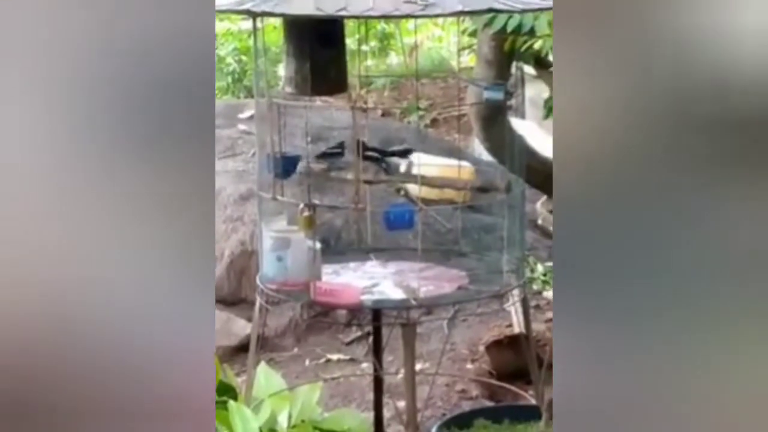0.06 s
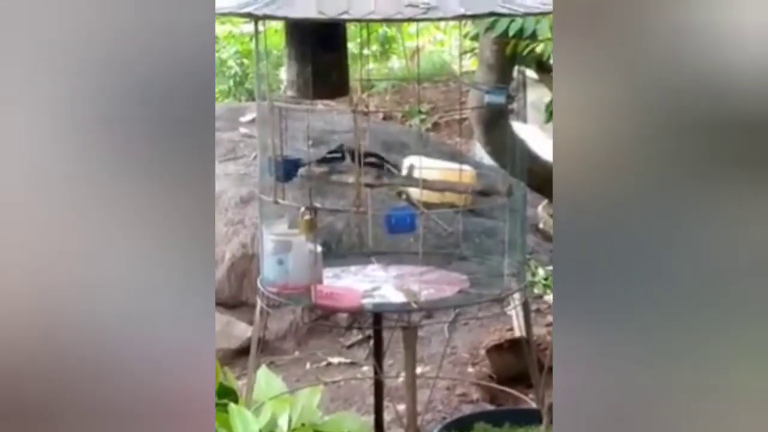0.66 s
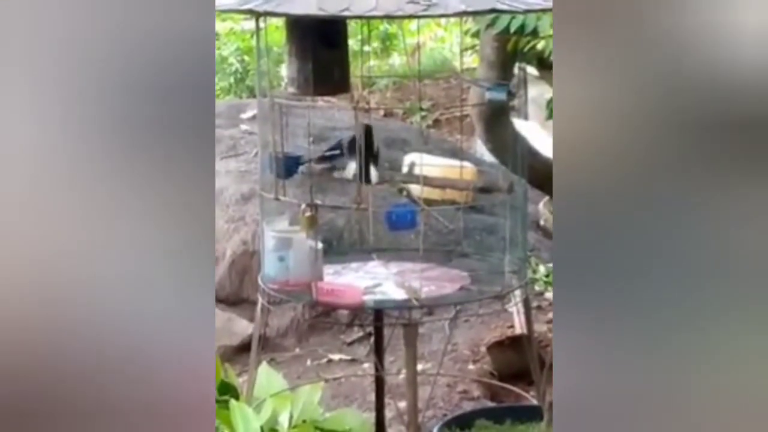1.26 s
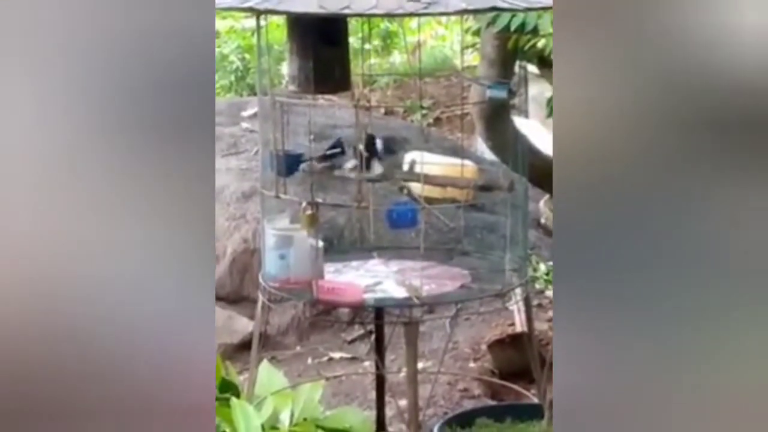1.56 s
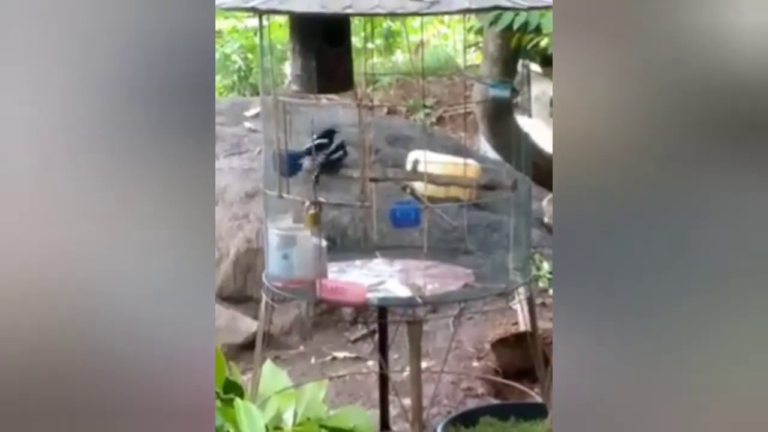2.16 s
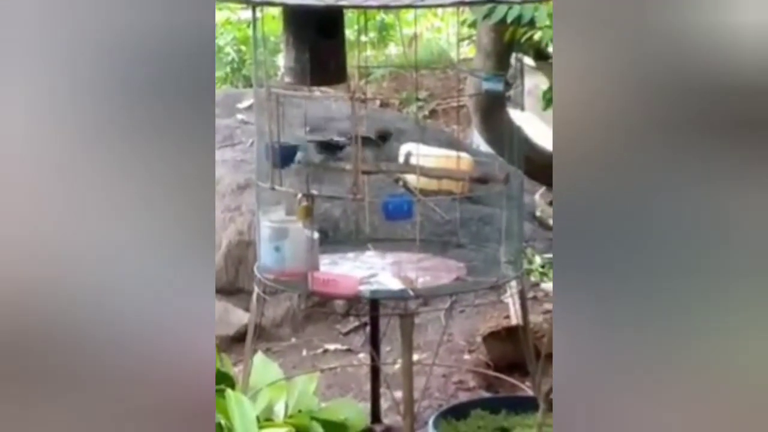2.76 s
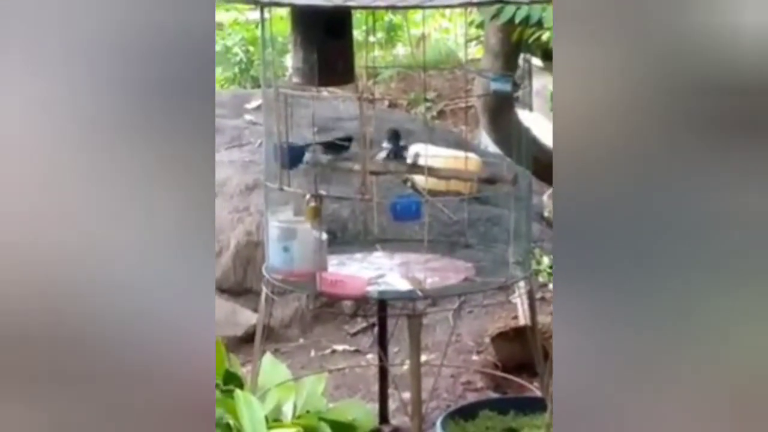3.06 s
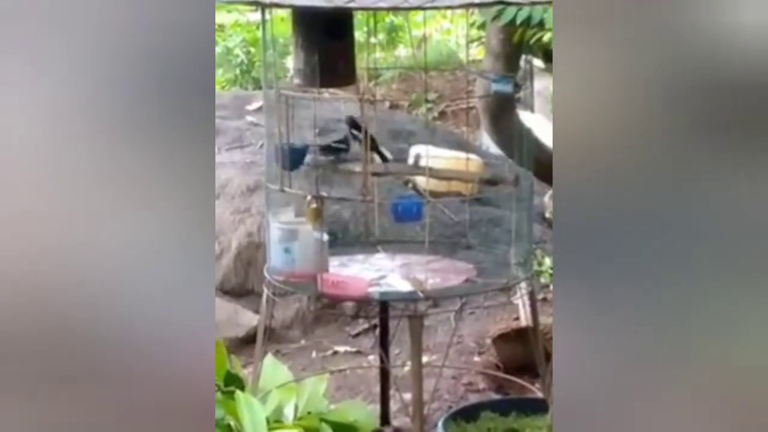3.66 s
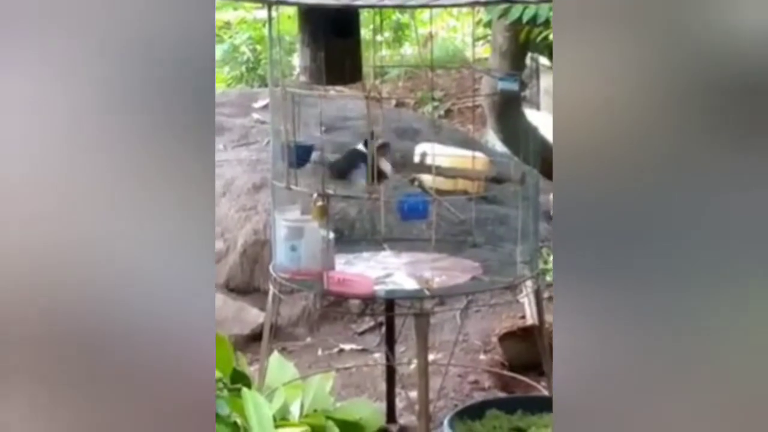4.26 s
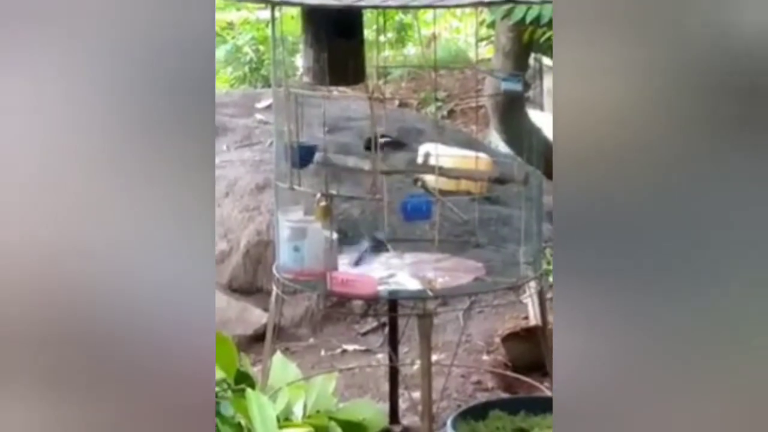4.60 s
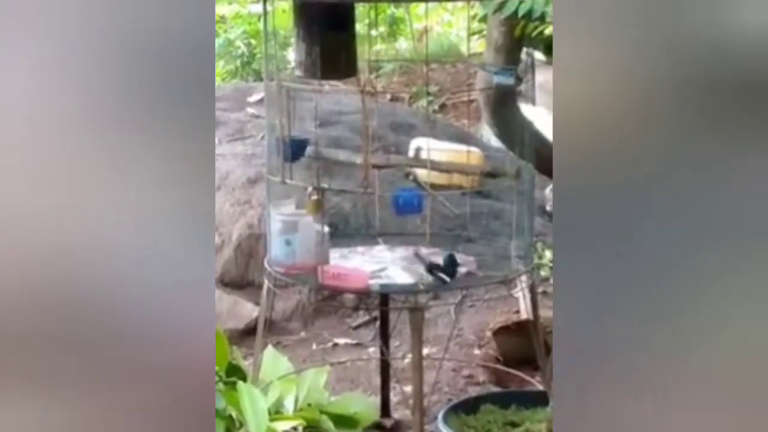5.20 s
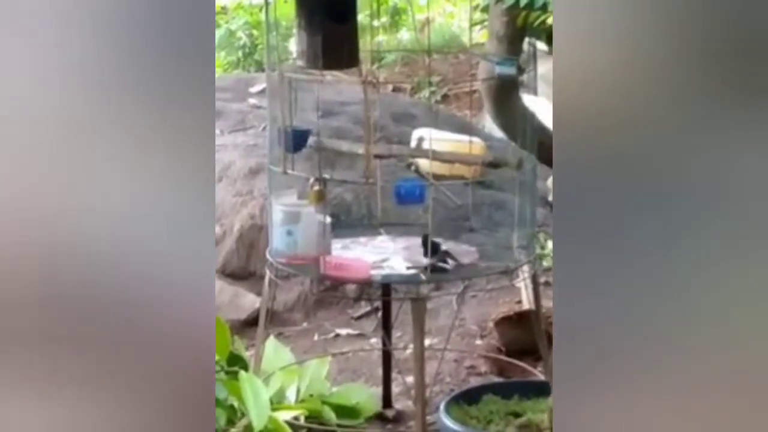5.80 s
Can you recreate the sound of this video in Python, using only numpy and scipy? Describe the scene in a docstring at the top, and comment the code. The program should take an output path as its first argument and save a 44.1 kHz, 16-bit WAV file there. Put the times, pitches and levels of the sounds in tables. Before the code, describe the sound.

In a quiet yard, a pair of caged birds a few metres away scold each other with sharp chips, squeaks and raspy falling calls. They switch to short upward whistles and brief level notes, lightly bumping the perches, then flare into thin screeches, shrill squeaks and two buzzing snarls. Nearby rock adds a slight echo and the cage wires ring faintly. Soft outdoor air and a far motor's hum lie underneath.

```python
"""Magpie-robins squabble and sing in a wire cage in a yard, a few metres away.
First the syrinx gives squeaks, harsh chips, hoarse downslurs and brief whistles. From 2.3 s come
upslurs and knocks on the perches, then more whistles, chips and squeaks. From 4.5 s the membranes
slap in three screeches, from 5.3 s in two nasal snarls. Throughout, nearby rock and walls smear
each note and the wires ring, over outdoor air, a low rumble and a far motor."""
import sys
import numpy as np
from scipy import signal
from scipy.fft import rfft, irfft
from scipy.io import wavfile
from scipy.ndimage import map_coordinates

SR = 44100
rng = np.random.default_rng(int(sys.argv[2]) if len(sys.argv) > 2 else 0)


def digitize_waveform(pressure):
    """Quantize a signal to 16-bit integers and store it at the path in sys.argv[1].

    Rows of a 2-D input are taken as channels; values are limited to [-1, 1].
    """
    field = np.atleast_2d(pressure).T
    bounded = np.clip(field, -1, 1)
    quanta = np.round(bounded * 32767).astype(np.int16)
    wavfile.write(sys.argv[1], SR, quanta)


N = 257544
TIME_S = np.arange(N) / SR


def syrinx(arc_hz, rasp, wobble=0.00376, flutter=0.0567, shake=0.51, grit=0.16):
    """Pitch, phase and pressure of one note; a rasping membrane shakes in pitch and strength."""
    size = len(arc_hz)
    t = TIME_S[:size]
    rise_s, fall_s = 0.011, 0.0052
    hz = arc_hz * (1 + wobble * wander(size, 48.7) + flutter * rasp * wander(size, 330))
    rise = np.sin(np.pi / 2 * np.clip(t / rise_s, 0, 1))
    fall = np.sin(np.pi / 2 * np.clip(t[::-1] / fall_s, 0, 1))
    uneven_cycles = 1 + grit * rasp * wander(size, 1000)
    pressure = unit(rise * fall * uneven_cycles * np.exp(shake * rasp * wander(size, 221)))
    return hz, 2 * np.pi * np.cumsum(hz) / SR, pressure


# Half-closed beak in song: f/Hz, gain/dB
SONG_BEAK = [(1200, 13.5), (3500, 3), (5200, -3), (7200, 4.5), (8800, -16.5), (10800, -4), (12500, -38),
             (14300, -9), (15500, -27)]


def note(arc_hz, rasp, overtone_db, rolloff_db, hiss_db, colour=SONG_BEAK):
    """Coloured syrinx harmonics, plus turbulent air in step with the rasp."""
    hz, phase, pressure = syrinx(arc_hz, rasp)
    k = np.arange(1, 7)[:, None]
    harmonics = undb((k > 1) * (overtone_db + rolloff_db * (k - 3.5))) * (k * hz < SR / 2)
    tone = unit(np.sum(harmonics * response(k * hz, colour) * np.sin(k * phase), axis=0))
    hiss = noise(len(hz), [(1000, -25), (2500, 3), (4500, 10), (6800, 3), (8500, -32),
                           (10000, 8), (15500, -9)])
    return pressure * (tone + undb(hiss_db) * rasp * hiss)


def scratch(size, colour, burst_hz=420, depth=0.53):
    """Chaotic membrane slaps: uneven bursts of coloured noise."""
    edge = np.sin(np.pi * np.linspace(0, 1, size)).clip(0) ** .5
    return unit(noise(size, colour) * edge * np.exp(depth * wander(size, burst_hz)))


# Chip tone colour, two notched outlines: f/Hz, A (bright at 6-7 kHz)/dB, B (bright near 9 kHz)/dB
CHIP_COLOUR = [(1950, -14, -18.5), (2605, -1, -3), (3140, -17, -19), (4260, -1.5, -0.5), (5600, 12.5, -2),
               (5970, 13.5, -8), (6830, 15.5, 0.5), (7950, 8, 4), (8460, -28.5, 7), (9100, -2.5, 9.5),
               (10330, 0.5, -2), (11000, -9.5, -2), (12250, -2.5, 3.5), (13500, 0, -8), (15500, -10, -7)]
# Chips: t/s, length/s, start f/Hz, middle f/Hz, end f/Hz, level/dB, scratch/dB, A-to-B blend/0-1,
# overtones/dB, rasp/0-1
CHIPS = [ (0.206, 0.037, 2410, 2476, 2240, -44, 5, 0, -17, .7),
         (0.307, 0.055, 2725, 2600, 2090, -42, -12, 0.8, -34, 0.97),
         (0.434, 0.067, 2755, 2916, 2584, -40, -15, 0.37, -19, 0.65),
         (0.662, 0.09, 3650, 4364, 4140, -32.5, -12, 0.9, -10.5, 0.74),
         (0.856, 0.049, 2690, 2480, 2106, -29.5, -9, 0, -3, 0.43),
         (0.952, 0.049, 2736, 2534, 2135, -30.5, -14, 0, -3, 0.31),
         (1.078, 0.038, 3360, 3863, 3970, -33, -20, 0.1, -7.5, 0.89),
         (1.105, 0.029, 2680, 2300, 2040, -34, -5, 0, -3, 0.33),
         (1.177, 0.056, 3640, 4090, 4590, -34.5, -9, 0.79, -7, 0.41),
         (1.22, 0.027, 4560, 3953, 2520, -34, -14, 0.46, -8, 0.93),
         (1.683, 0.036, 2572, 2316, 2150, -48, -3.5, 0.36, -1, 0.34),
         (1.762, 0.027, 4240, 4894, 4360, -33, -13, 0.86, -9, .8),
         (1.834, 0.057, 2553, 2346, 1870, -35.5, -1, 0.69, -0.5, 0.58),
         (3.536, 0.06, 5040, 4120, 3510, -38.5, -8, 0.98, -9, 0.68),
         (4.703, 0.035, 3236, 3383, 3190, -34, -7.5, 0.3, -4, 0.53),
         (5.529, 0.075, 1695, 2090, 2083, -33.5, -7, 0.5, -10, 0.5), ]


def chips(rasp_growth=0.46):
    """Scolding pitch arches that roughen, each coloured by a blend of two outlines."""
    out = np.zeros((2, N))
    for start_s, length_s, *pitches_hz, db, scratch_db, blend, overtone_db, rasp in CHIPS:
        u = progress(length_s)
        arc_hz = np.polyval(np.polyfit([0, .5, 1], pitches_hz, 2), u)
        colour = [(hz, a_db + blend * (b_db - a_db)) for hz, a_db, b_db in CHIP_COLOUR]
        effort = np.sin(np.pi / 2 * np.minimum(2 * u, 1)) ** 2
        roughness = rasp + rasp_growth * u
        voice = note(arc_hz, roughness, overtone_db, rolloff_db=-1.5, hiss_db=-20, colour=colour)
        sound = unit(voice) + undb(scratch_db) * unit(effort * scratch(len(u), colour))
        add(out, start_s, undb(db) * unit(sound), pan_db=0.5)
    return out


# Squeaks: t/s, length/s, f/Hz, level/dB, overtones/dB, rasp/0-1, L-R/dB
SQUEAKS = [ (-.003, 0.01, 7043, -16, -10, 0.02, 4.5), (0.018, 0.038, 6750, -28.5, -24, 0, 3),
           (1.774, 0.0156, 6030, -29, -23.5, 0.54, 3), (3.548, 0.043, 5510, -44, -13, 0, -5),
           (3.55, 0.064, 7030, -36.5, -20, 0.56, -0.5), (5.038, 0.1, 7820, -42, -20, 0.2, -4),
           (5.125, 0.066, 7460, -32.5, -12, 0.47, 1), (5.388, 0.15, 7745, -27, -3, 0.16, -3),
           (5.547, 0.058, 7124, -24.5, -6, 1, 1), ]


def squeaks(sag_oct_per_s=.5):
    """Piercing high tones that droop slightly."""
    out = np.zeros((2, N))
    for start_s, length_s, hz, db, overtone_db, rasp, pan_db in SQUEAKS:
        arc_hz = sagging(length_s, hz, sag_oct_per_s)
        voice = note(arc_hz, rasp, overtone_db, rolloff_db=-2.5, hiss_db=-14)
        add(out, start_s, undb(db) * voice, pan_db)
    return out


# Nasal, buzzing bands of a snarl at tuning 1: f/Hz, width/Hz, level/dB
SNARL_BANDS = [(4070, 260, -7.5), (5090, 800, 1.5), (6170, 900, -9), (7580, 600, -3.5), (9120, 2800, -5),
               (10600, 2800, -8.5), (12770, 1900, -8.5), (14800, 2400, -13.5)]
# Snarls: t/s, length/s, tuning/ratio, level/dB, L-R/dB
SNARLS = [(5.294, 0.257, 0.98, -32.5, 0.5), (5.753, 0.15, .94, -36, 3)]


def snarls(slaps_per_s=1300, sag_oct_per_s=.25, attack_s=.014, release_s=0.018):
    """Irregular slaps buzz in slowly sinking nasal bands; low ones also sing, high ones swell."""
    out, t = np.zeros((2, N)), TIME_S[:SR // 40]
    tone_db, tone_db_per_oct, swell_db_per_oct = 3, -24, 4
    for start_s, length_s, tuning, db, pan_db in SNARLS:
        u = progress(length_s)
        gate = np.clip(u * length_s / attack_s, 0, 1) * np.clip((1 - u) * length_s / release_s, 0, 1)
        slaps = rng.choice([-1., 1.], SR) * (rng.random(SR) < slaps_per_s / SR)
        glide = sagging(length_s, tuning, sag_oct_per_s)
        sound = 0
        for hz, width_hz, band_db in SNARL_BANDS:
            octaves = np.log2(hz / SNARL_BANDS[0][0])
            ring = (t ** 2 * np.exp(-np.pi * width_hz * t)) ** 2 * np.sin(2 * np.pi * hz * t)
            rattle = signal.fftconvolve(slaps, ring)
            band = unit(map_coordinates(rattle, [len(t) + np.cumsum(glide)], order=5))
            _, phase, pressure = syrinx(hz * glide, rasp=0.348)
            tone = undb(tone_db + tone_db_per_oct * octaves) * pressure * np.sin(phase)
            swell = undb(swell_db_per_oct * octaves * np.minimum(2 * u, 1))
            sound = sound + undb(band_db) * unit(band + tone) * unit(swell)
        add(out, start_s, undb(db) * unit(gate * sound), pan_db)
    return out


# Upslurs: t/s, length/s, start f/Hz, top f/Hz, foot/s, climb/s, level/dB, overtones/dB, rasp/0-1
UPSLURS = [ (2.295, 0.094, 1877, 2515, 0.012, 0.083, -39.5, -23, 0.15),
           (2.537, 0.11, 1839, 2441, 0.018, 0.078, -39, -18, 0.15),
           (2.804, 0.037, 1947, 2498, 0.0017, 0.01, -38, -25, 0.39),
           (2.992, 0.043, 2023, 2590, 0.0014, 0.015, -38, -25, 0.32),
           (3.148, 0.12, 2590, 3532, 0.0061, .056, -39.5, -10.5, 0.19),
           (3.274, 0.18, 2028, 3274, 0.001525, 0.12, -39.5, -16.5, 0.39),
           (3.735, 0.091, 2918, 3567, 0.023, 0.028, -36.5, -14.5, 0.09),
           (4.159, 0.13, 2316, 2566, 0.0022, .02, -41, -9.5, 0.03), ]


def upslurs(stall=0.92, swell_db=11, full_rasp_hz_per_s=48000, air_db=-19.5):
    """Whistles swell from a low foot in two steps, with a thin rush of air; fast climbs rasp more."""
    out = np.zeros((2, N))
    for start_s, length_s, low_hz, top_hz, foot_s, climb_s, db, overtone_db, rasp in UPSLURS:
        u = progress(length_s)
        climbed = np.clip((u * length_s - foot_s) / climb_s, 0, 1)
        below_top = 1 - climbed + stall * np.sin(4 * np.pi * climbed) / (4 * np.pi)
        arc_hz = top_hz + (low_hz - top_hz) * below_top
        strain = np.sin(np.pi * climbed) * (top_hz - low_hz) / climb_s / full_rasp_hz_per_s
        voice = note(arc_hz, rasp + strain, overtone_db, rolloff_db=-4.5, hiss_db=-15.5)
        air = undb(air_db) * np.sin(np.pi * u) * noise(len(u), [(4000, -34), (9500, -44), (14000, 23)])
        add(out, start_s, undb(db) * (unit(voice * undb(-swell_db * below_top)) + air), pan_db=2)
    return out


# Whistles: t/s, length/s, f/Hz, level/dB, overtones/dB, rasp/0-1, L-R/dB, sag/(oct/s)
WHISTLES = [ (0.895, 0.029, 810, -57.5, -20, 0, 2, 0.032), (1.213, 0.029, 4310, -41, -24, 0.05, 3.5, 0.13),
            (2.593, 0.017, 818, -57, -29, 0.2, 3, .2), (2.862, 0.027, 2490, -45.5, -13, 0.34, -2, -0.061),
            (3.809, 0.034, 6170, -48, -36, 0.05, 6, -0.15), (3.817, 0.044, 2740, -36, -23, 0.3, -0.5, 0.18),
            (3.963, 0.063, 2782, -40.5, -21, 0.11, 0, 0.33),
            (4.295, 0.099, 2767, -45.5, -17, 0.18, 1, -0.19),
            (4.384, 0.028, 2857, -38.5, -25, 0.1, 1, -0.088),
            (4.488, 0.11, 2740, -42, -11.5, 0.21, 2.5, 0.79), (4.737, 0.078, 3390, -37, 0, 0.37, 1, 0.13),
            (4.884, 0.063, 1698, -57, -27, 0.06, -4.5, 0.25),
            (4.913, 0.058, 1676, -52.5, -38, 0.02, 7, 0.33),
            (5.049, 0.096, 2104, -44, -3, 0.18, 0.5, 0.367),
            (5.079, 0.024, 2815, -30, -9, 0.24, -3.5, -0.000092),
            (5.227, 0.095, 1706, -51, -45.5, 0.39, -3, 1.0),
            (5.685, 0.115, 1247, -54.5, -15.5, 0.58, 2, 0.25), ]


def whistles():
    """Tones held near one pitch."""
    out = np.zeros((2, N))
    for start_s, length_s, hz, db, overtone_db, rasp, pan_db, sag_oct_per_s in WHISTLES:
        arc_hz = sagging(length_s, hz, sag_oct_per_s)
        voice = note(arc_hz, rasp, overtone_db, rolloff_db=-7, hiss_db=-4)
        add(out, start_s, undb(db) * voice, pan_db)
    return out


# Downslurs: t/s, length/s, start f/Hz, end f/Hz, level/dB, overtones/dB, rasp/0-1
DOWNSLURS = [ (0.016, 0.087, 2457, 2316, -48, -36, 0.98), (0.229, 0.076, 2782, 2432, -40, -23.5, 0.77),
             (0.231, 0.051, 1440, 1190, -52.5, 8, 0.52), (0.33, 0.07, 2360, 1880, -51.5, -8, 1),
             (0.854, 0.023, 2700, 2700, -45.5, -10, 0.2), (0.943, 0.022, 2727, 2690, -43.5, -13, 0),
             (1.079, 0.038, 4140, 4000, -41.5, -18, 0.62), (1.35, 0.15, 1665, 1622, -60, -14.5, 0.7),
             (1.486, 0.14, 1558, 1165, -54.5, -2, 0.43), (1.528, 0.086, 4400, 3930, -42.5, 0, 0.6),
             (1.403, 0.018, 2500, 2700, -46, -1, 1), (1.479, 0.033, 2668, 2580, -43, -8, 0.89),
             (1.514, 0.17, 2134, 1900, -50, 13.5, 1), (1.556, 0.0303, 7800, 7640, -55.5, -25, 0.3),
             (1.566, 0.027, 6120, 5865, -47, -26, 0.18), (1.682, 0.05, 3520, 3410, -48.5, -3, 0.86),
             (1.706, 0.052, 4755, 4560, -41.5, -5, 1), (1.857, 0.024, 4540, 4260, -38, 1, 0.75),
             (1.899, 0.08, 2098, 1345, -48, 1.5, 1), (3.513, 0.045, 5960, 5100, -41.5, 0, 0.3),
             (3.598, 0.068, 3210, 2070, -54, 2, 1), (3.864, 0.018, 2470, 2370, -38.5, -20, 0),
             (4.058, 0.024, 2706, 2100, -48, -5.5, 0.98), (4.333, 0.069, 3478, 3060, -42, -14, 0.22),
             (4.355, 0.047, 2465, 1900, -54, -3, 0.94), (4.552, 0.045, 3333, 3216, -35, -19, 0.2),
             (4.585, 0.11, 2515, 1957, -49.5, -13, 0.93), (4.71, 0.1, 2284, 2106, -53.5, -18, 1),
             (5.045, 0.034, 5880, 5600, -43, -20, 0.2), (5.537, 0.043, 2120, 1952, -46, -20, 0.73),
             (5.431, 0.11, 1526, 1260, -53.5, -4, 0.27), (5.776, 0.092, 1637, 1330, -56.5, 0, 1), ]


def downslurs(bend=1.6):
    """Hoarse notes, nearly all falling ever faster; two clean, level tones near 0.85 and 0.94 s open the chips
    that follow."""
    out = np.zeros((2, N))
    for start_s, length_s, start_hz, end_hz, db, overtone_db, rasp in DOWNSLURS:
        arc_hz = start_hz + (end_hz - start_hz) * progress(length_s) ** bend
        voice = note(arc_hz, rasp, overtone_db, rolloff_db=1.5, hiss_db=-8)
        add(out, start_s, undb(db) * voice, pan_db=0.5)
    return out


# Open beak in a screech: f/Hz, gain/dB
OPEN_BEAK = [(1200, -21.5), (2600, -14), (3400, 1.5), (4000, 2), (5000, -5.5), (6500, 0), (7300, 2.5),
             (9000, -4), (11200, -3.5), (12300, -6), (13500, -10), (15500, -15)]
# Screeches: t/s, length/s, pulse rate/Hz, level/dB, throat f/Hz, rasp/0-1, L-R/dB
SCREECHES = [ (4.555, 0.051, 667, -49.5, 5900, 0, 4.5), (4.712, 0.11, 684.6, -39, 5370, 0.2, 0),
             (5.027, 0.086, 971, -41.5, 7010, 0.19, 3), ]


def screeches(sag_oct_per_s=.46, swell_db_per_s=37.5, throat_db=13, half_width_hz=230, scratch_db=-7):
    """Slapping membranes give a scratchy stack that swells as it sinks; the throat lifts one partial."""
    out = np.zeros((2, N))
    for start_s, length_s, pulse_hz, db, throat_hz, rasp, pan_db in SCREECHES:
        hz, phase, pressure = syrinx(sagging(length_s, pulse_hz, sag_oct_per_s), rasp)
        k = np.arange(1, int(TOP_HZ / hz.mean()) + 1)[:, None]
        throat = 1 + undb(throat_db) / (1 + ((k * hz - throat_hz) / half_width_hz) ** 2)
        scatter = rng.uniform(0, 2 * np.pi, k.shape)
        stack = unit(np.sum(response(k * hz, OPEN_BEAK) * throat * np.sin(k * phase + scatter), axis=0))
        pressure = unit(pressure * undb(swell_db_per_s * TIME_S[:len(hz)]))
        rattle = scratch(len(hz), [(3000, -36), (4800, 9), (6700, -6), (8200, 2), (10500, 4),
                                   (12600, -5), (14000, -4), (15300, -1)])
        add(out, start_s, undb(db) * pressure * (stack + undb(scratch_db) * rattle), pan_db)
    return out


# Knocks: t/s, level/dB, f/Hz, t60/s
KNOCKS = [(2.309, -40.5, 271, 0.038), (3.788, -20, 4850, 0.00093), (4.151, -42.5, 635, 0.017),
          (4.276, -50, 77.5, 0.41), (5.378, -57, 1000, 0.18)]


def knocks():
    """Feet and wings bump perches and wires; lower bumps swell more slowly."""
    out, t = np.zeros((2, N)), TIME_S[:SR // 2]
    for start_s, db, hz, t60_s in KNOCKS:
        body = noise(len(t), [(hz / 4, -20), (hz, 0), (hz * 2, -16), (hz * 10, -50)])
        add(out, start_s, undb(db) * body * (1 - np.exp(-t * hz)) * 1000 ** (-t / t60_s), pan_db=0)
    return out


# Cage wires, rung by calls at their pitch: f/Hz, level/dB, t60/s
WIRES = [(4290, -22, 1.1), (4350, -28, .9), (9190, -27, .5)]


def walls(calls, direct_db=-4, gap_s=0.0026, near_t60_s=.25, far_db=-17, far_t60_s=.62):
    """Direct sound, a spray of echoes off rock and walls, a duller tail and the ring of the cage."""
    t, out = TIME_S[:SR], []
    wires = sum(undb(db) * unit(np.sin(2 * np.pi * hz * t) * 1000 ** (-t / t60_s))
                for hz, db, t60_s in WIRES)
    for channel in calls:
        spray = rng.standard_normal(SR) * (rng.random(SR) < .04)
        near = spray * (t > gap_s) * 1000 ** (-t / near_t60_s)
        dull = noise(SR, [(300, 0), (3000, 0), (15000, -12)])
        far = dull * (1 - np.exp(-t / 0.0051)) * 1000 ** (-t / far_t60_s)
        echoes = (unit(near) + undb(far_db) * unit(far) + wires) / np.sqrt(SR)
        out.append(undb(direct_db) * channel + signal.fftconvolve(channel, echoes)[:N])
    return np.array(out)


# Air spectrum: f/Hz, relative density/dB
YARD_AIR = [(22, 3.5), (54, 2), (102, -9.5), (170, -10), (300, -14.5), (600, -18.5), (1500, -20.5),
            (3300, -25), (4200, -16.5), (5200, -18.5), (6600, -12.5), (8400, -25), (10000, -21.5),
            (15500, -31.5)]


def yard_air(level_db=-57, side_db=-2):
    """Outdoor air, alike on both sides in the bass."""
    mid = noise(N, YARD_AIR) * undb(wander(N, 2.724))
    side = signal.sosfilt(signal.butter(2, 450, "high", fs=SR, output="sos"), noise(N, YARD_AIR))
    return undb(level_db) * (mid + undb(side_db) * side * np.array([[1], [-1]]))


# Rumble tones: f/Hz, level/dB
RUMBLE = [(31.2, -65.5), (66, -71), (120, -74)]
# Motor envelope: t/s, level/dB
MOTOR = [(0.0, -78), (1.09, -75.5), (1.93, -61), (2.24, -86), (2.81, -62.5), (4.23, -69), (4.28, -76),
         (5.12, -78.5), (5.84, -95)]


def rumble_and_motor(motor_hz=154, drift=0.01064, waver_db=4.3):
    """Low tones and a far motor's hum, each wavering in pitch and level."""
    out = np.zeros(N)
    motor_db = np.interp(TIME_S, *np.transpose(MOTOR))
    for hz, db in [*RUMBLE, (motor_hz, motor_db)]:
        phase = 2 * np.pi * np.cumsum(hz * (1 + drift * wander(N, 1.31))) / SR
        out += 2 ** .5 * undb(db + waver_db * wander(N, 1.5)) * np.sin(phase)
    return out


def progress(length_s):
    """0 to 1 over a note."""
    return np.linspace(0, 1, int(length_s * SR))


def sagging(length_s, pitch, oct_per_s):
    """Pitch sinking as the air runs out; a negative rate rises."""
    return pitch * 2 ** (-oct_per_s * length_s * progress(length_s))


def undb(db):
    """Decibels to gain."""
    return 10 ** (np.asarray(db) / 20)


def unit(x):
    """Scale to rms 1."""
    return x / np.sqrt(np.mean(x ** 2) + 1e-18)


def response(hz, outline):
    """Gain at hz of an (f/Hz, gain/dB) outline."""
    knots_hz, db = np.transpose(outline)
    return undb(np.interp(np.log(hz + 1), np.log(knots_hz), db))


def noise(size, outline):
    """Noise coloured by an (f/Hz, gain/dB) outline."""
    gain = response(np.fft.rfftfreq(size, 1 / SR), outline)
    return unit(irfft(rfft(rng.standard_normal(size)) * gain, size))


def wander(size, hz):
    """Smooth random motion up to about hz, spread near 1."""
    knots = rng.standard_normal(int(size * 2 * hz / SR) + 4)
    return map_coordinates(knots, [np.arange(size) * 2 * hz / SR], order=3, mode="nearest")


def add(out, start_s, sound, pan_db):
    """Mix in at start_s; pan_db is left minus right."""
    onset = int(start_s * SR)
    first, end = max(onset, 0), min(onset + len(sound), N)
    for channel, db in zip(out, (pan_db / 2, -pan_db / 2)):
        channel[first:end] += undb(db) * sound[first - onset:end - onset]


def scene(left_lag_s=.00013):
    """Birds in the yard, slightly to the right, so their calls reach the left later."""
    left, right = upslurs() + whistles() + downslurs() + squeaks() + chips() + screeches() + snarls()
    left = np.pad(left, (int(left_lag_s * SR), 0))[:N]
    return walls([left, right]) + knocks() + yard_air() + rumble_and_motor()


TOP_HZ = 15700
# Microphone port colour: f/Hz, L-R/dB
PORTS = [(1500, -0.5), (2600, 3.5), (3300, -3.5), (4300, 0), (5500, 3.5), (6600, 6), (7600, 8), (8600, -5),
         (10200, -10), (12300, -7.5), (14500, 1)]


def record(dry):
    """Two microphone ports, alike in the bass, colour the sides; low-pass at TOP_HZ."""
    tilt = response(np.fft.rfftfreq(2 * N, 1 / SR), [(400, 0), *PORTS]) ** .5
    coloured = irfft(rfft(dry, 2 * N) * np.array([tilt, 1 / tilt]))[:, :N]
    return signal.sosfilt(signal.ellip(10, .2, 80, TOP_HZ, fs=SR, output="sos"), coloured)


dry = scene()
out = record(dry)
digitize_waveform(out)
```